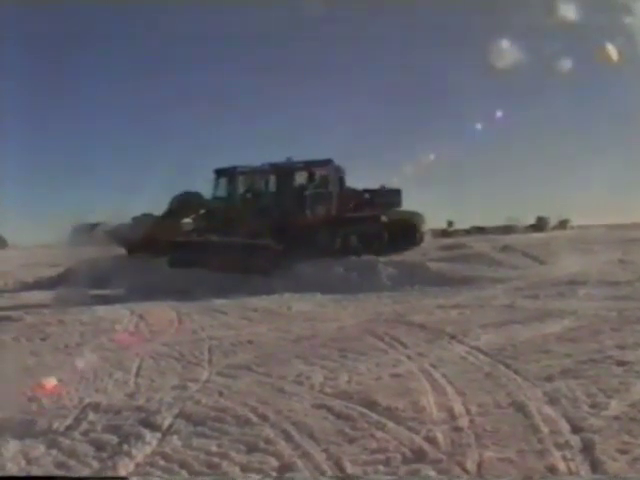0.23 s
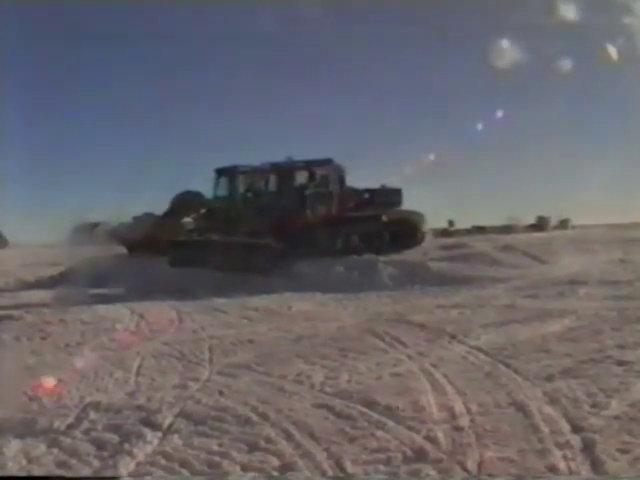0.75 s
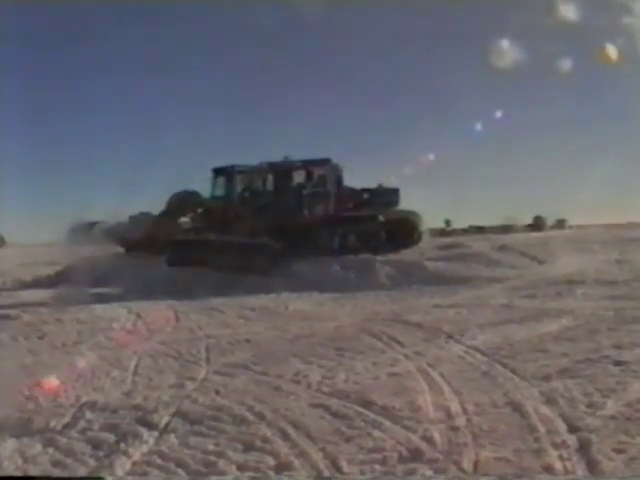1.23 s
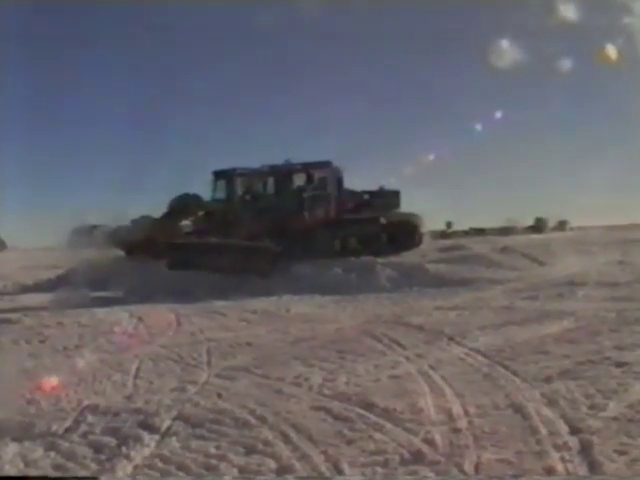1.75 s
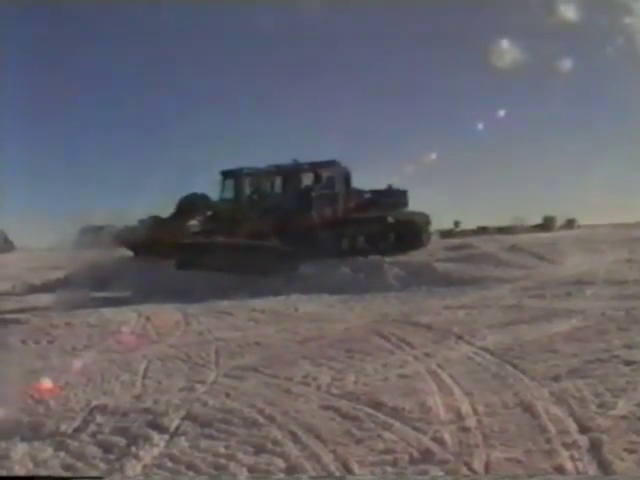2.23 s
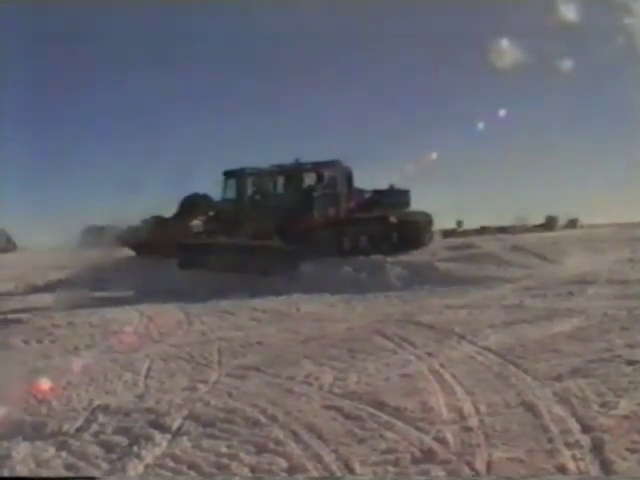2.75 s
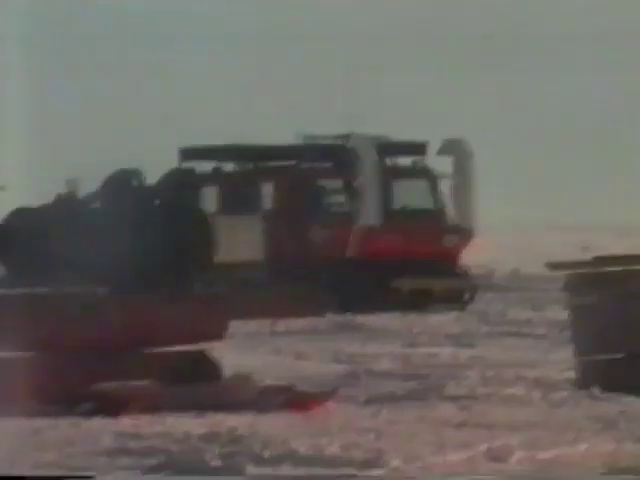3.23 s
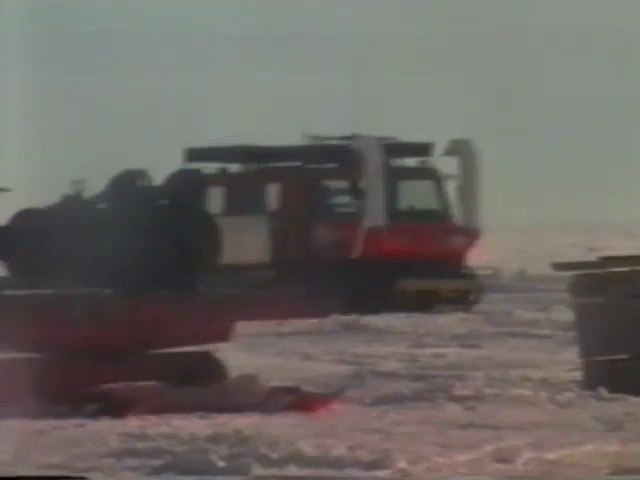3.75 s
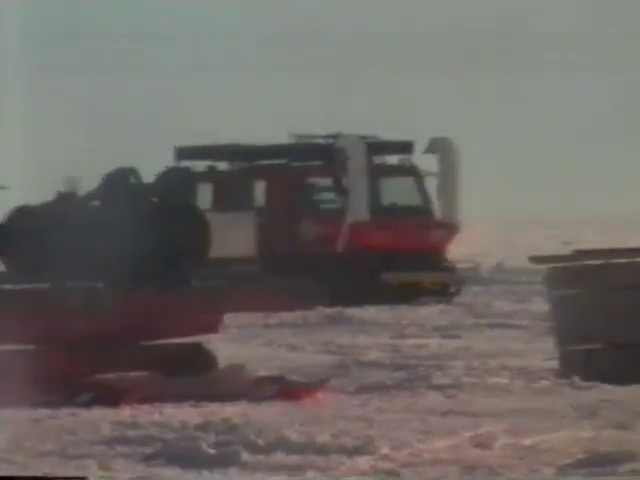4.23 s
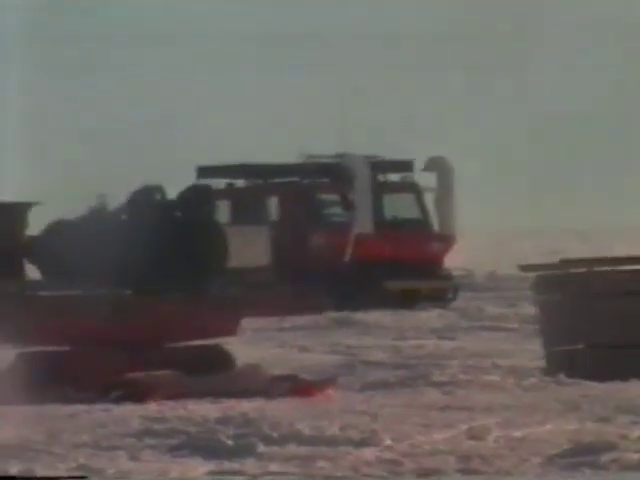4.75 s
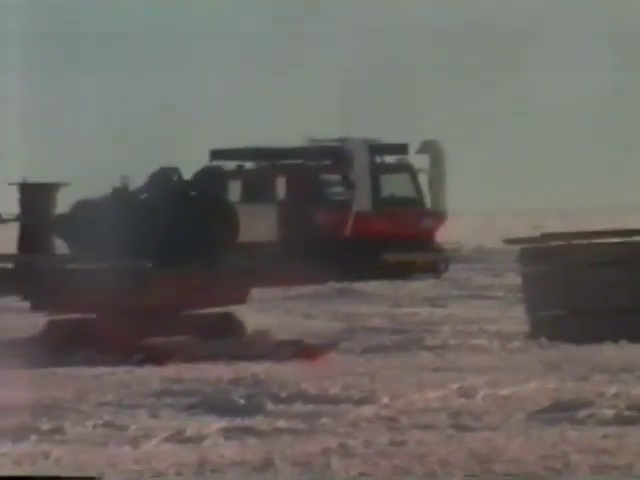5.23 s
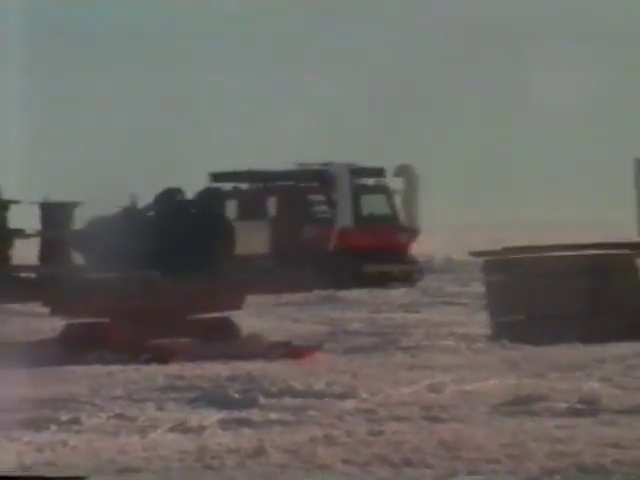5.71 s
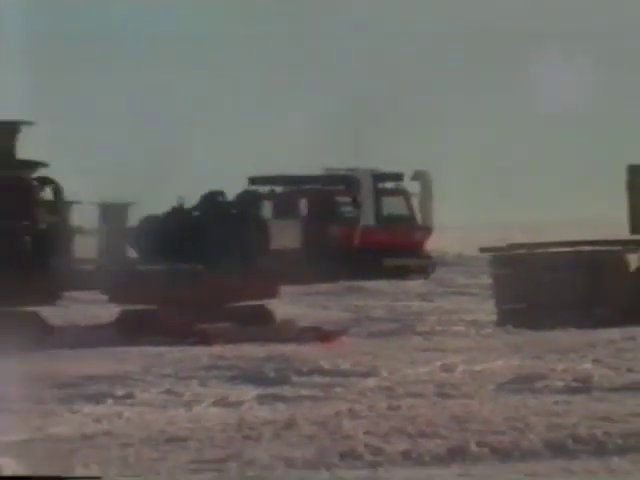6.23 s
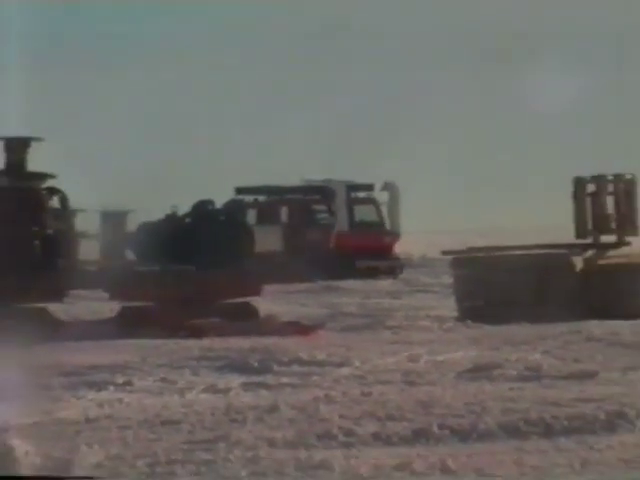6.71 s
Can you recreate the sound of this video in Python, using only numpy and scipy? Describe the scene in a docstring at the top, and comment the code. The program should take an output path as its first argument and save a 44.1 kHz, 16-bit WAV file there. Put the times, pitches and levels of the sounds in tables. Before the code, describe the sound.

A small film projector runs close by on the left from the start, with a fast, even clatter of about twelve beats a second. Each beat combines a hollow little knock with the rasp of sliding film and a light ring of thin metal, over a whirring motor and faint singing gears. A slight stray knock comes at about 0.7 seconds. At about 3.3 seconds the sound jumps abruptly to a thinner, brighter version of the same clatter, keeping its speed, with a little more metallic ringing. At about 6.7 seconds a brief rattle of sharp clicks and knocks, like a join in the film passing through, stands out for a tenth of a second as the machine runs on. Throughout, a faint electrical buzz, a very high thin whistle, low rumble and hiss sit behind the projector.

```python
"""A small film projector clatters close by on the left, about 12 frames a second. Each turn drags the film
through the gate, and the claw (the hook that pulls the film) knocks. Metal parts ring, the motor whirrs and
gears sing. Halfway, the sound jumps to a thinner, brighter stretch. Near the end something, probably a splice
(a join in the film), rattles through. Behind it all are electrical buzz, a faint whistle, rumble and hiss."""
import sys
import numpy as np
from scipy.fft import rfft, irfft, next_fast_len
from scipy.io import wavfile
from scipy.ndimage import map_coordinates

SR = 44100
rng = np.random.default_rng(int(sys.argv[2]) if len(sys.argv) > 2 else 0)


def inscribe(sig):
    """Save sig as 16-bit PCM at rate SR to the path in sys.argv[1].

    A 1-D sig is mono; a 2-D sig holds one channel per row.
    Samples are clipped to [-1, 1] before scaling.
    """
    pcm = np.round(np.clip(np.atleast_2d(sig).T, -1, 1) * 32767)
    wavfile.write(sys.argv[1], SR, pcm.astype(np.int16))


N = 307818

JUMP_S = 3.345  # the second stretch starts here
# A pull starts ahead of the claw's strike, builds, holds and lets go. All four are in turns.
PULL_LEAD, PULL_ATTACK, PULL_HOLD, PULL_RELEASE = 0.43, 0.17, 0.27, 0.35
PULL_DB, PULL_SCATTER_DB = 7.5, 0.9  # extra drag in a pull, and how much it varies
CHATTER_T60 = 0.13  # a t60 is the seconds a sound takes to fade by 60 dB
CATCH_S = 0.016  # half the length of a catch in the film
PING_SCATTER_DB, PING_JITTER_TURNS = 2, 0.0011
SNAG_S, SNAG_DB, SNAG_FALL_DB_PER_S = 6.764, -38.5, 380  # ticks are loudest where the splice snags
THUD_HZ, THUD_DB = 340, -22  # the housing's low note, with its level against each thump
BUZZ_HZ, BUZZ_JOLT_S = 25, .0258  # the buzz's tones meet in one jolt this far into each cycle
WHISTLE_HZ, TOP_HZ = 15625, 15800

# The shaft, one row per stretch. Each row: time of one claw strike in seconds, turns a second.
SHAFT_RUNS = [(.0225, 12.415), (3.4295, 12.404)]
# The clatter's level in dB, one value per stretch.
CLATTER_DB = [-47, -51]

# Tone colours of the projector. Each row: frequency in Hz, relative level in dB.
HOUSING_FIRST = [(150, -25), (350, -35), (470, -13), (560, -7.5), (750, -0.5), (900, -6.5), (990, -5.5),
                 (1110, 2), (1235, 1), (1520, -5.5), (2350, -6), (3000, -20), (7000, -22.5), (8200, -41)]
HOUSING_SECOND = [(150, -40), (330, -11.5), (480, -11), (570, -4.5), (760, 3.5), (880, -2.5), (1040, -2),
                  (1280, -3.5), (1600, 0.5), (2300, -3.5), (3700, -16.5), (4500, -14.5), (7000, -15.5),
                  (11000, -30)]
SLIDE_COLOUR = [(600, -5.5), (1200, -1.5), (2000, -2), (3000, 5), (5000, 1), (6000, -3), (6700, -0.5),
                (9000, -5)]  # bright
KNOCK_COLOUR = [(420, -5.5), (560, 3.5), (750, -1), (1200, 1), (2000, -14), (5000, -3), (9000, -13)]  # hollow
CLICK_COLOUR = [(1200, -6.5), (2200, 13), (3700, -6), (4500, 12.5), (5300, 11), (6100, -1), (6900, 7.5),
                (8200, -35)]
MOTOR_COLOUR = [(330, -7), (600, -4.5), (1150, 4), (1800, 3.5), (3000, -6.5), (8000, -7)]
RATTLE_COLOUR = [(150, -20), (320, 0), (440, 2), (540, 10), (750, 11), (1030, 9.5), (1600, 5.5), (2300, 6),
                 (3200, -5), (4500, -16), (9000, -28)]
TICK_COLOUR = [(500, -21), (1200, 15), (3000, -8), (7500, -3), (12000, -7), (15500, -10)]

# Parts that ring as the film drags past.
# Each row: pitch in Hz, width in Hz, level in dB in the first stretch, then in the second.
METAL_NOTES = [(2516, 93, -16, -2.5), (2628, 210, 5, -4), (2772, 150, -0.5, -1), (2907, 170, -8.5, -5),
               (3115, 230, -7.5, -10.5)]
PANEL_NOTES = [(1800, 39, -14, -29), (1899, 41, -26, -2.5), (1983, 62, -11, -0.5), (2040, 38, 3, 3.5),
               (2110, 92, 2, -0.5), (2251, 84, 0, 2.5), (2318, 65, -6, -0.5)]
GUIDE_NOTES = [(4293, 220, 0, 0.5), (4604, 270, -5, -2)]
# The film guide's ring swells and fades. Each row: time in seconds, level in dB.
GUIDE_LEVELS = [(0, -13), (.85, -14), (1.3, -26), (2.5, -21), (2.95, -16), (3.3, -8), (3.45, -6), (4.3, -7),
                (5.25, -6.5), (5.65, -10), (6.1, -3), (6.6, -3)]
# The film runs looser and tighter. Each row: time in seconds, friction in dB, metal chatter in dB.
FILM_TIGHTNESS = [(0, 0, -2), (.7, -1.5, -2), (1.549, -5, -2.5), (2.4, -1.5, -3), (2.75, -3, 2.5),
                  (3.3, 0.5, -0.5), (3.45, -0.6, 2), (4.2, -1, 3.5), (5.002, -0.5, 5), (6.6, 0.5, 1)]
# The film catches for a moment. Each row: time in seconds, extra drag in dB.
FILM_CATCHES = [(.02, 1.5), (2.68, 3.5), (2.83, 1), (3.241, 0.5), (4.555, 2.5), (4.635, 1.5), (4.718, 0.5),
                (6.33, 0)]
# Jolts that shake the thin metal. Each row: turns after the strike, level in dB.
METAL_JOLTS = [(-.295, 3), (-.015, 0)]
# The claw hooks in, strikes home and returns. Each row: turns after the strike, level in dB,
# turns between bounces, loss per bounce in dB (below zero, the bounces grow).
CLAW_KNOCKS = [(-.29, -1, 0.1, -1.5), (-.005, 3.5, 0.11, 3), (0.461, -2, 0.055, 2.5)]
# The claw scrapes back, clinks into the film and clicks home.
# Each row: turns after the strike, level in dB, t60 in seconds.
CLAW_CLICKS = [(-.5, -6, .1), (-.28, -8, .04), (-.028, -2, 0.019)]
# Small parts struck once a turn. Each row: turns after the strike, pitch in Hz, t60 in seconds,
# level in dB in the first stretch, then in the second.
SMALL_PARTS = [(-.02, 1235, 0.083, -40.5, -58), (-.29, 2610, 0.047, -46.5, -45),
               (-0.05, 4000, 0.018, -59, -48)]
# The claw hits those parts harder. Each row: time in seconds, extra level in dB.
HARD_HITS = [(.264, 8), (1.07, 6.5), (1.714, 7), (1.795, 9.5), (2.358, 6), (2.439, 9), (3.083, 4),
             (3.325, 8)]
# Gear tones. Each row: multiple of the turn rate, level in dB in the first stretch, then in the second.
GEAR_TONES = [(54, -67, -68), (84, -66, -66), (95, -54, -63), (97, -68, -64), (99, -59.5, -65),
              (102, -55.5, -72), (107, -60, -74), (109, -59.5, -74), (117, -60, -72), (130, -74, -59),
              (135, -64, -74), (141, -74, -63), (153, -68, -63), (155, -74, -62), (158, -72, -62.5),
              (165, -74, -66), (169, -65, -74)]
# One stray knock, then the splice.
# Each row: start in seconds, thump level in dB, thump pitch in Hz, rattle level in dB.
HOLLOW_KNOCKS = [(.7475, -33, 680, -41), (6.7395, -35, 760, -38), (6.7585, -26, 1270, -35),
                 (6.7635, -26.5, 1030, -38), (6.7795, -27, 700, -35), (6.787, -35, 520, -41),
                 (6.8005, -27, 700, -36.5), (6.816, -36, 1100, -38), (6.8305, -33, 950, -37),
                 (6.846, -35.5, 780, -42)]

# Electrical buzz. Each row: multiple of BUZZ_HZ, level in dB.
BUZZ_TONES = [(1, -72), (2, -72.5), (3, -71), (4, -86), (5, -71.5), (6, -89), (7, -78), (8, -87.5),
              (9, -77), (10, -82.5), (11, -84.5), (13, -85.5), (15, -80), (17, -78)]
# Tone colours of the background. Each row: frequency in Hz, relative level in dB.
RUMBLE_COLOUR = [(12, 7), (40, -13), (90, -5.5), (150, 4), (280, -5), (500, 0.5), (1200, 0.5),
                 (4000, -15.5)]
HISS_FIRST = [(3000, 2.5), (6800, 0), (7600, -1.5), (8100, -80), (8700, -4), (10000, 2.5), (11200, -1.5),
              (12500, -9.5), (13700, -8.5), (14800, -12), (15700, -7)]
HISS_SECOND = [(3000, 10), (6800, 7), (8500, 3.5), (10000, 6.5), (11100, 11), (12500, 5), (14000, 2.5),
               (15600, -13)]


def projector(stretch, housing, slide_db, knock_db, metal_db, panel_db, motor_db, click_db,
              gear_db, gear_load):
    """One slightly unsteady shaft drives film, claw and gears. Stretch 0 is the first, 1 the second."""
    t = np.arange(N) / SR
    strike_s, rate = SHAFT_RUNS[stretch]
    turns = rate * (t - strike_s + .00016 * wobble(2) + .00002 * wobble(18))
    pull_db = film_pulls(turns)
    drag = unit(amp(pull_db + .6 * wobble(22) + 1.3 * wobble(450)))
    slide = coloured(drag * rubbing(turns, share=0.35), housing, SLIDE_COLOUR)
    metal = metal_chatter(turns, rate, stretch)
    panels = ringing(unit(drag ** 1.25) * rng.standard_normal(N), PANEL_NOTES, stretch)
    # Squaring the drag makes the guide ring mostly at the height of each pull.
    guide = ringing(unit(drag ** 2) * rng.standard_normal(N), GUIDE_NOTES, stretch)
    guide *= amp(np.interp(t, *np.transpose(GUIDE_LEVELS)))
    knocks = claw_knocks(turns, rate, housing, t60=.038, scatter_db=.9)
    clicks = claw_clicks(turns, rate)
    motor = coloured(rubbing(turns, share=0.14), housing, MOTOR_COLOUR)
    times, friction_db, chatter_db = np.transpose(FILM_TIGHTNESS)
    film = amp(slide_db) * slide + amp(panel_db) * panels + amp(click_db) * clicks
    film *= amp(np.interp(t, times, friction_db))
    metal *= amp(metal_db + np.interp(t, times, chatter_db))
    catches = amp(sum(db * np.exp(-((t - at) / CATCH_S) ** 2) for at, db in FILM_CATCHES))
    clatter = catches * (film + metal + guide) + amp(knock_db) * knocks + amp(motor_db) * motor
    teeth = amp(gear_db) * unit(amp(gear_load * pull_db)) * gears(turns, stretch)  # louder in a pull
    return amp(CLATTER_DB[stretch]) * clatter + teeth + pings(turns, rate, stretch)


def film_pulls(turns):
    """The drag on the film, in dB, builds, holds and lets go once a turn. No two pulls are equal."""
    turn, since = np.divmod(turns - turns[0] // 1 + 1 + PULL_LEAD, 1)
    corners = np.cumsum([0, PULL_ATTACK, PULL_HOLD, PULL_RELEASE])
    depth_db = PULL_DB + PULL_SCATTER_DB * rng.standard_normal(size=128)
    return depth_db[turn.astype(int)] * np.interp(since, corners, [0, 1, 1, 0])


def claw_knocks(turns, rate, housing, t60, scatter_db):
    """Each blow of the claw lands and bounces three times, at a new strength on every turn."""
    power = np.zeros(N)
    for at, db, gap, loss_db in CLAW_KNOCKS:
        for bounce in range(4):
            turn, since = np.divmod(turns - turns[0] // 1 + 2 - at - bounce * gap, 1)
            strength = amp(db - bounce * loss_db + scatter_db * rng.standard_normal(size=128))
            power += (strength[turn.astype(int)] * amp(-60 * since / rate / t60)) ** 2
    return coloured(unit(np.sqrt(power)) * rubbing(turns, share=0.53), housing, KNOCK_COLOUR)


def claw_clicks(turns, rate):
    """The moving claw makes three short, bright bursts of noise a turn."""
    bursts = sum(amp(db - 60 * ((turns - at) % 1) / rate / t60) for at, db, t60 in CLAW_CLICKS)
    return coloured(unit(bursts) * rng.standard_normal(N), CLICK_COLOUR)


def metal_chatter(turns, rate, stretch):
    """Thin metal chatters after each jolt, then dies away."""
    shaking = sum(amp(db - 60 * ((turns - at) % 1) / rate / CHATTER_T60) for at, db in METAL_JOLTS)
    return ringing(unit(shaking) * rubbing(turns, share=0.6), METAL_NOTES, stretch)


def pings(turns, rate, stretch):
    """Each small struck part rings and fades, a little differently on every turn."""
    t = np.arange(N) / SR
    sound = np.zeros(N)
    for at, hz, t60, *levels_db in SMALL_PARTS:
        turn, since = np.divmod(turns - turns[0] // 1 + 1 - at, 1)
        strength, late = rng.standard_normal(size=(128, 2))[turn.astype(int)].T
        age_s = np.maximum(since - PING_JITTER_TURNS * np.abs(late), 0) / rate
        fade = amp(levels_db[stretch] + PING_SCATTER_DB * strength - 60 * age_s / t60)
        sound += fade * np.sin(2 * np.pi * hz * age_s)
    return sound * amp(sum(db * (np.abs(t - at) < .5 / rate) for at, db in HARD_HITS))


def gears(turns, stretch):
    """Meshing teeth sing at whole multiples of the turn rate, each tone wavering a little."""
    sound = np.zeros(N)
    for multiple, *levels_db in GEAR_TONES:
        level = amp(levels_db[stretch] + 2 * wobble(7))
        phase = 2 * np.pi * (round(multiple) * turns + rng.random()) + .4 * wobble(22)
        sound += level * np.sqrt(2) * np.sin(phase)
    return sound


def hollow_knocks(thump_t60, thump_attack_s, rattle_t60, tick_t60):
    """Each knock is a short thump with a rattle. Those near the splice's snag also tick."""
    t = np.arange(N) / SR
    age_s = t[:SR // 10]
    thumps, rattles, ticks = np.zeros((3, N))
    thud = amp(THUD_DB) * np.sin(2 * np.pi * THUD_HZ * age_s)
    for start, thump_db, hz, rattle_db in HOLLOW_KNOCKS:
        shape = amp(thump_db - 60 * age_s / thump_t60) * (1 - np.exp(-age_s / thump_attack_s))
        thumps[round(start * SR):][:len(age_s)] += shape * (np.sin(2 * np.pi * hz * age_s) + thud)
        rattles += (t >= start) * amp(rattle_db - 60 * np.abs(t - start) / rattle_t60)
        tick_db = SNAG_DB - SNAG_FALL_DB_PER_S * abs(start - SNAG_S)
        ticks += (t >= start) * amp(tick_db - 60 * np.abs(t - start) / tick_t60)
    rattles = coloured(rattles * rng.standard_normal(N), RATTLE_COLOUR)
    ticks = coloured(ticks * rng.standard_normal(N), TICK_COLOUR)
    return thumps + rattles + ticks


def electronics(buzz_db, whistle_db, rumble_db):
    """A pulsing electrical buzz and a thin whistle over a low rumble, all louder on the left."""
    t = np.arange(N) / SR
    tone = lambda hz, db: np.sqrt(2) * amp(db) * np.sin(2 * np.pi * hz * (t - BUZZ_JOLT_S))
    buzz = sum(tone(round(multiple) * BUZZ_HZ, db + buzz_db) for multiple, db in BUZZ_TONES)
    whistle = tone(WHISTLE_HZ, whistle_db)
    rumble = amp(rumble_db) * noise_pair(RUMBLE_COLOUR)
    return buzz * amp([[2.7], [-4.3]]) + whistle * amp([[0], [-3]]) + rumble * amp([[0], [-6]])


def hiss(colour, db):
    """A slightly wavering hiss, much weaker on the right."""
    return noise_pair(colour) * amp(db + 0.78 * wobble(23)) * amp([[0], [-18.5]])


def rubbing(turns, share):
    """The same rough surfaces meet on every turn, so a share of their noise repeats."""
    surface = rng.standard_normal(SR // 12)
    repeated = map_coordinates(surface, [turns % 1 * len(surface)], mode="grid-wrap")
    return np.sqrt(share) * unit(repeated) + np.sqrt(1 - share) * rng.standard_normal(N)


def ringing(x, notes, stretch):
    """A part shaken by x rings near its own notes. White noise keeps its power."""
    size = next_fast_len(N + 8192)
    f = np.fft.rfftfreq(size, 1 / SR)
    response = sum(amp(db[stretch]) * (1j * f * width / (hz * hz - f * f + 1j * f * width)) ** 2
                   for hz, width, *db in notes)
    return irfft(rfft(x, size) * response / np.sqrt(np.mean(np.abs(response) ** 2)), size)[:N]


def coloured(x, *colours):
    """Filter x through all the given tone colours. White noise keeps its power."""
    size = 2 * next_fast_len(N // 2 + 8192)
    log_hz = np.log(np.fft.rfftfreq(size, 1 / SR) + 1)
    gain_db = sum(np.interp(log_hz, np.log(hz + 1), db) for hz, db in map(np.transpose, colours))
    gain = unit(amp(gain_db))
    # Folding the cepstrum makes the filter ring only after a hit, never before it.
    cepstrum = irfft(np.log(np.maximum(gain, 1e-4)), size)
    cepstrum[1:size // 2] *= 2
    cepstrum[size // 2 + 1:] = 0
    return irfft(rfft(x, size) * np.exp(rfft(cepstrum)), size)[:N]


def noise_pair(colour):
    """Two unrelated noises of one colour, left and right."""
    return np.array([coloured(rng.standard_normal(N), colour) for _ in range(2)])


def wobble(rate):
    """A smooth curve through `rate` random points a second."""
    return map_coordinates(rng.standard_normal(int(N * rate / SR) + 4), [np.arange(N) * rate / SR])


def amp(db):
    """Turn decibels into a gain."""
    return 10 ** (np.asarray(db) / 20)


def unit(x):
    """Scale x to an average power of 1."""
    return x / np.sqrt(np.mean(x ** 2) + 1e-20)


def scene():
    """The two stretches play in turn on the left. A weak, upside-down copy leaks to the right."""
    before_jump = np.arange(N) / SR < JUMP_S
    first = projector(stretch=0, housing=HOUSING_FIRST, slide_db=4.5, knock_db=2, metal_db=-3,
                      panel_db=-6.5, motor_db=4, click_db=-10, gear_db=-1, gear_load=0.31)
    second = projector(stretch=1, housing=HOUSING_SECOND, slide_db=6, knock_db=1, metal_db=-7,
                       panel_db=2.5, motor_db=5.5, click_db=-12, gear_db=-0.5, gear_load=0.62)
    machine = np.where(before_jump, first, second)
    machine += hollow_knocks(thump_t60=0.029, thump_attack_s=0.00093, rattle_t60=0.072, tick_t60=0.055)
    left_hiss, right_hiss = np.where(before_jump, hiss(HISS_FIRST, db=-53.5), hiss(HISS_SECOND, db=-52))
    left = machine + left_hiss
    right = right_hiss - amp(-19) * (machine + 0.25 * left_hiss)
    return np.array([left, right]) + electronics(buzz_db=-1, whistle_db=-77, rumble_db=-60)


def record(dry):
    """Remove all treble above TOP_HZ."""
    size = next_fast_len(N + 8192)
    return irfft(rfft(dry, size) * (np.fft.rfftfreq(size, 1 / SR) < TOP_HZ), size)[:, :N]


dry = scene()
out = record(dry)
inscribe(out)
```